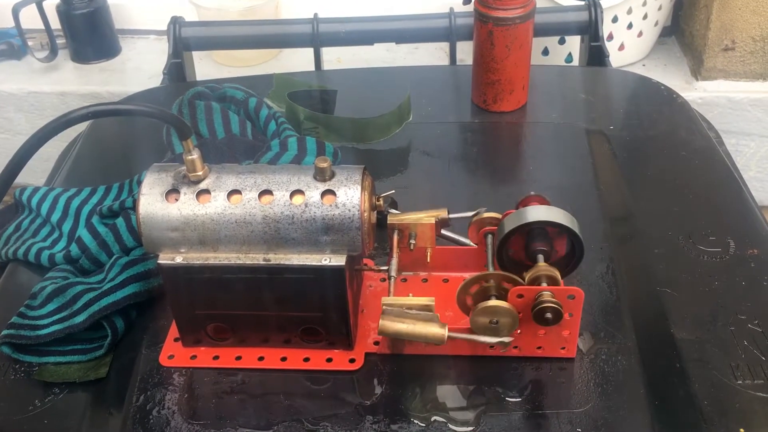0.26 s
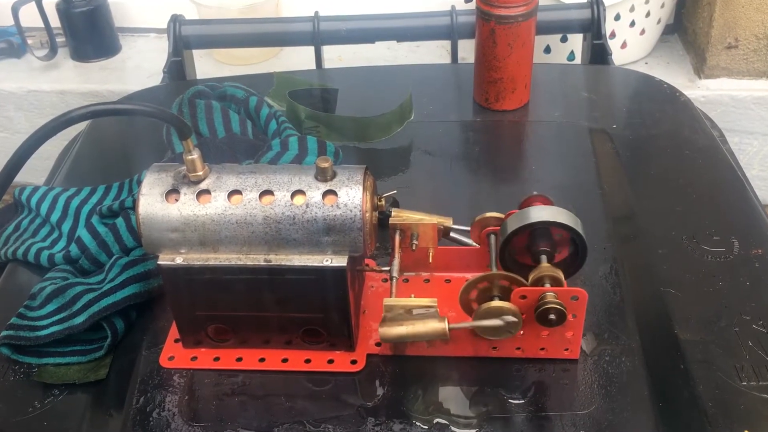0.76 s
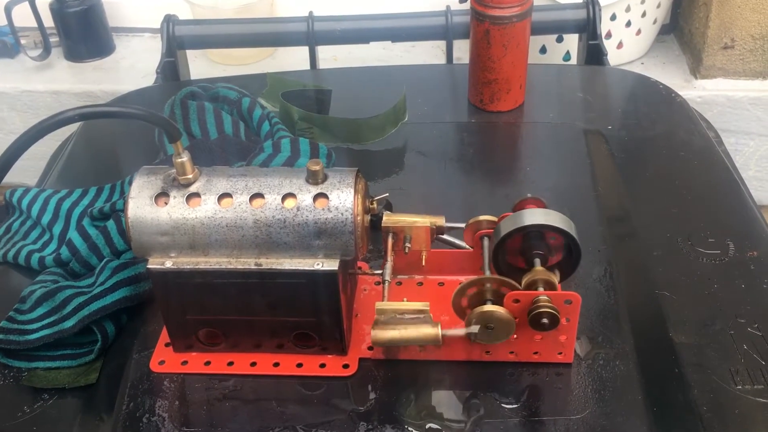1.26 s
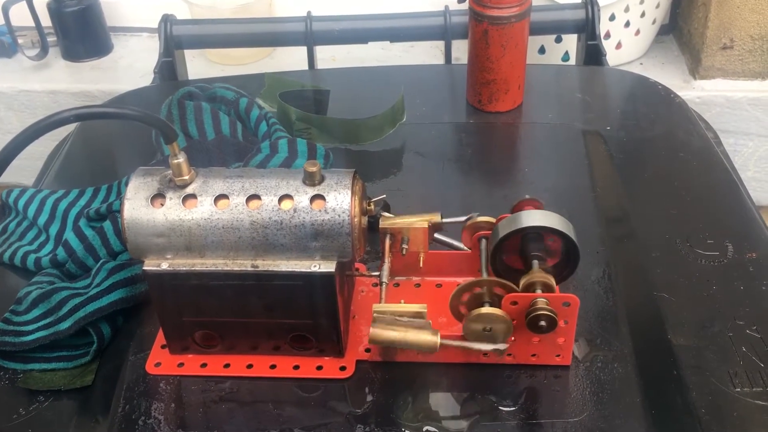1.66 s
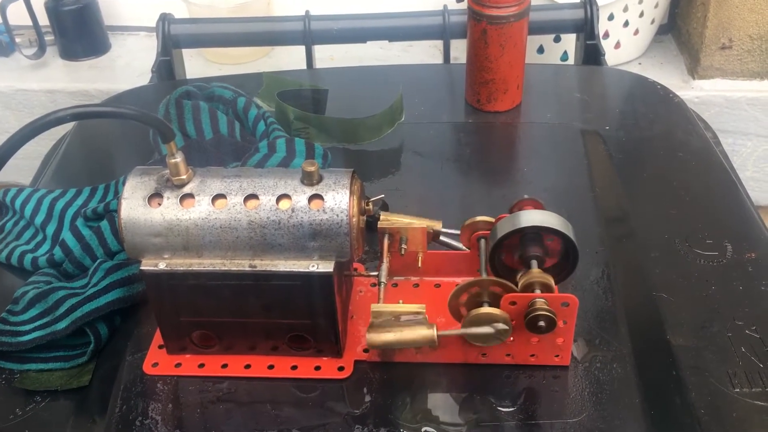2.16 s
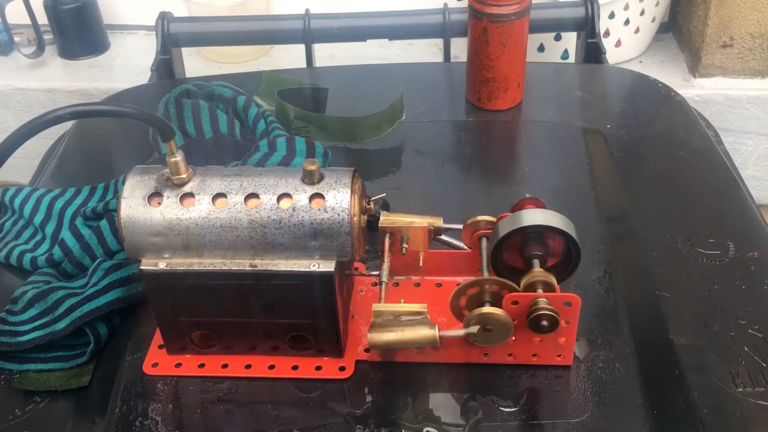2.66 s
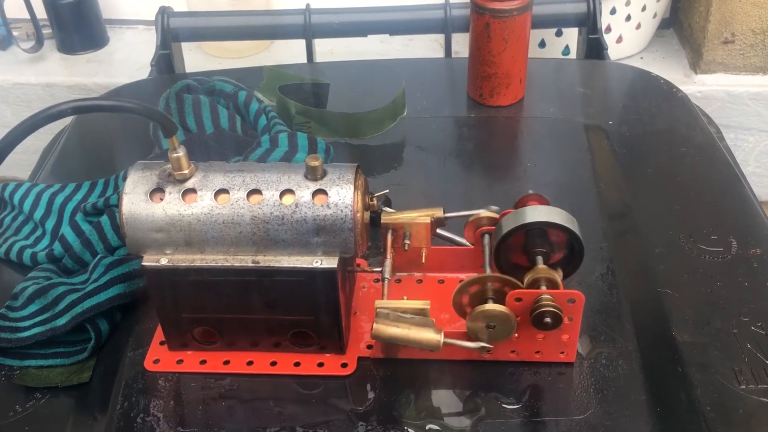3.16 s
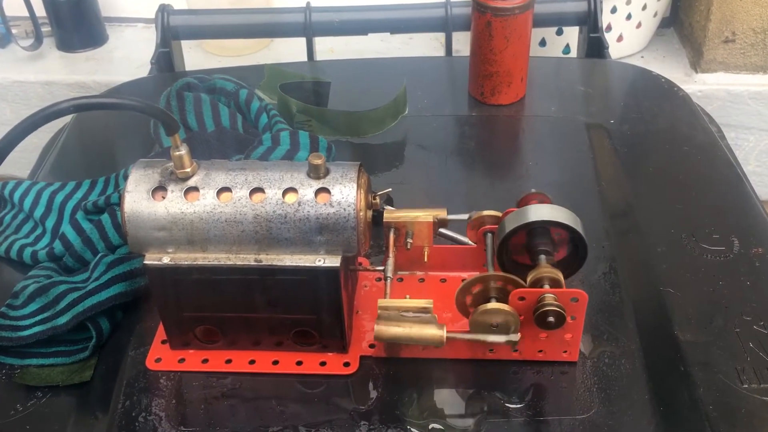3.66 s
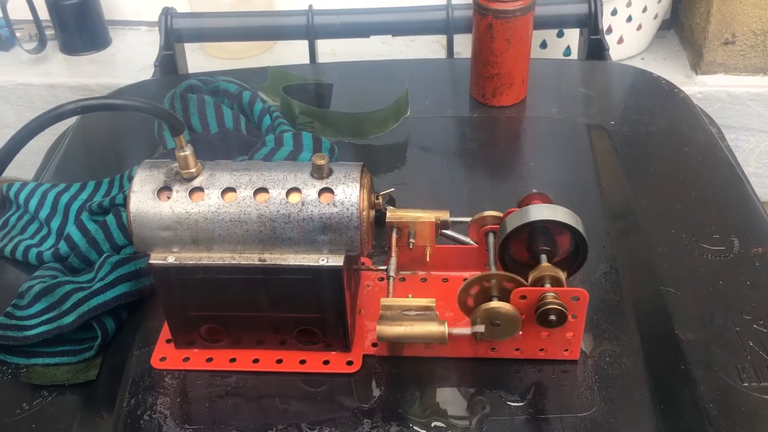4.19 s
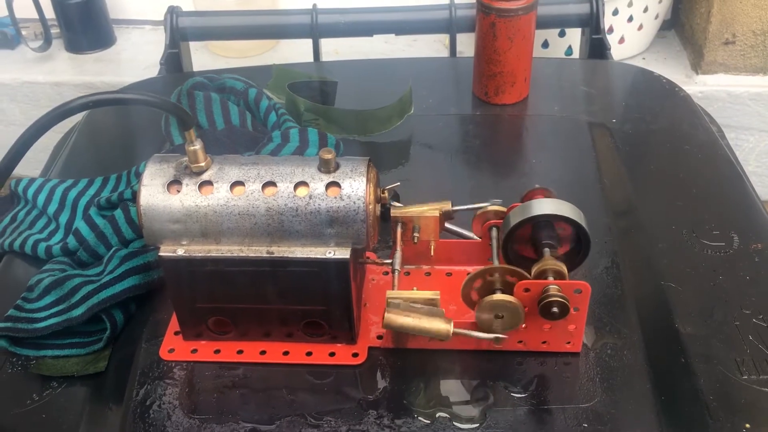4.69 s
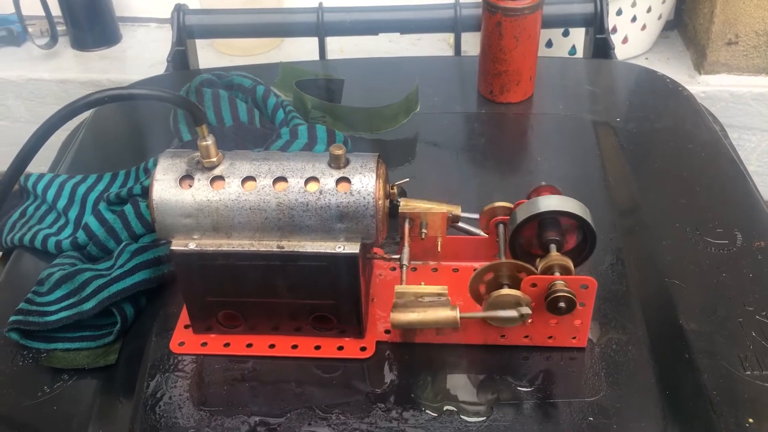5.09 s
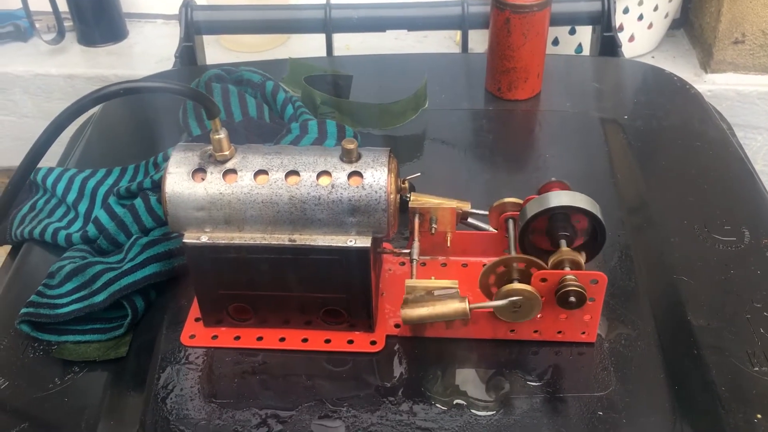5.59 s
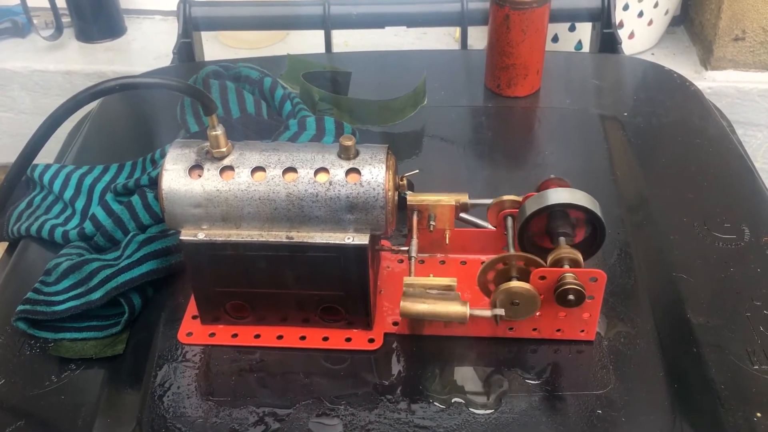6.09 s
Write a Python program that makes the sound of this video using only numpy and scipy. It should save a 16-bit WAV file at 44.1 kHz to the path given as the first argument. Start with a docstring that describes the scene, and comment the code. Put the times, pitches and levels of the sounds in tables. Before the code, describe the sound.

A model steam engine chuffs fast and evenly outdoors, with tinny clattering linkage, a low drumming and a soft breathy hoot.

```python
"""Outdoors, on a plastic bin lid, a model steam engine runs at about eight and a half turns a second.
In every turn the piston rubs, steam chuffs and spits from the port, and the loose linkage knocks on the
tin frame. The exhaust hoots softly, with a clean, sagging note on the return stroke. The lid drums under
the rocking engine, over faint air and boiler simmer; late on the hoot grows louder."""
import sys
import numpy as np
from scipy import signal
from scipy.fft import rfft, irfft
from scipy.io import wavfile
from scipy.ndimage import uniform_filter1d

SR = 44100
rng = np.random.default_rng(int(sys.argv[2]) if len(sys.argv) > 2 else 0)


def file_out(sig):
    """Save sig as 16-bit WAV at sys.argv[1]."""
    # one column per channel
    cols = np.atleast_2d(sig).T
    # limit, then scale
    lim = np.clip(cols, -1, 1)
    pcm = np.round(lim * 32767).astype(np.int16)
    wavfile.write(sys.argv[1], SR, pcm)


N = 279594
TURN_SIZE = 8192  # samples for one turn's sound and its tail
TURN_TIME = np.arange(TURN_SIZE) / SR


def amp(db):
    """Decibels to gain."""
    return 10 ** (np.asarray(db) / 20)


def unit(x):
    """Scales to an energy of one."""
    return x / np.sqrt(np.sum(x ** 2) + 1e-20)


def curve(points, hz):
    """Joins points by straight lines on a log-frequency axis."""
    point_hz, value = np.transpose(points)
    return np.interp(np.log(hz + 1), np.log(point_hz + 1), value)


def colour(x, spectrum):
    """EQs a sound; white noise keeps its power."""
    gain = amp(curve(spectrum, np.fft.rfftfreq(N, 1 / SR)))
    return irfft(rfft(x) * gain / np.sqrt(np.mean(gain ** 2)), N)


def ring(x, modes, opposed=True):
    """Drives decaying modes; heard off the driven spot, neighbours swing in opposite directions."""
    t = np.arange(SR // 4) / SR
    response = np.zeros(len(t))
    for k, (hz, db, t60) in enumerate(modes):
        mode = np.sin(2 * np.pi * hz * t) * amp(-60 * t / t60)
        response += (-1) ** (k * opposed) * amp(db) * unit(mode)
    return signal.oaconvolve(x, unit(response))[:N]


def tinny(x, wet_db, t60=0.055):
    """The boiler shell's countless high modes add a short metallic tail."""
    t = np.arange(SR // 8) / SR
    tail = unit(rng.standard_normal(len(t)) * amp(-60 * t / t60))
    treble = signal.sosfilt(signal.butter(2, 2000, "high", fs=SR, output="sos"), x)
    return x + amp(wet_db) * signal.oaconvolve(treble, tail)[:N]


# tempo of the crank: (time [s], speed [turns/s])
CRANK_SPEED = [(0, 8.5905), (.58, 8.628), (1.44, 8.5312), (2.46, 8.5664), (2.71, 8.5097), (4.23, 8.5144),
               (5.1, 8.3787), (6.3, 8.5061)]
def turn_starts(first_s=-0.0297):
    """The downbeats: times at which the crank begins a turn."""
    t = np.arange(first_s, N / SR, 1 / 1000)
    speed = np.interp(t[:-1], *np.transpose(CRANK_SPEED))
    turns = np.r_[0, np.cumsum(speed * np.diff(t))]
    return np.interp(np.arange(int(turns[-1]) + 1), turns, t)


def scatter(size):
    """One random deviation for each turn."""
    return size * rng.standard_normal(len(turn_starts()))


def each_turn(sounds, delay=0, db=0):
    """Triggers one sound in every turn of the crank, after a delay."""
    starts = turn_starts() + delay
    gains = amp(db + np.zeros(len(starts)))
    track = np.zeros(N + 2 * SR)  # a spare second at each end
    for start, sound in zip(starts, sounds * gains[:, None]):
        track[SR + round(start * SR):][:len(sound)] += sound
    return track[SR:SR + N]


# how alike the turns sound: (frequency [Hz], likeness [0-1])
TURN_LIKENESS = [(100, 1), (400, 0.9), (900, 0.55), (2000, 0.59), (6000, 0), (14000, 0.5)]
def bursts(envelope):
    """One noise burst a turn: the same surfaces meet each time, so part repeats and part is new."""
    envelope = unit(envelope)
    repeating = rng.standard_normal(TURN_SIZE) * envelope
    for _ in range(3):  # flatten the spectrum, then restore the envelope
        repeating = irfft(np.exp(1j * np.angle(rfft(repeating))))
        power = abs(uniform_filter1d(repeating ** 2, size=128))
        repeating *= envelope / np.sqrt(power + 1e-12)
    fresh = rng.standard_normal((len(turn_starts()), TURN_SIZE)) * envelope
    alike = np.clip(curve(TURN_LIKENESS, np.fft.rfftfreq(TURN_SIZE, 1 / SR)), 0, 1)
    return irfft(alike * rfft(unit(repeating)) + np.sqrt(1 - alike ** 2) * rfft(fresh))


def swell(start, attack, hold, release, db=0):
    """Envelope within a turn: a straight rise, a hold, then an exponential fall."""
    t = TURN_TIME - start
    return amp(db) * np.clip(t / attack, 0, 1) * np.exp(-np.maximum(t - attack - hold, 0) / release)


def pulsed_noise(swells, scatter_db):
    """Noise that swells at the same points of every turn, a little stronger or weaker each time."""
    envelope = sum(swell(*row) for row in swells)
    return each_turn(bursts(envelope), db=scatter(scatter_db))


# slow level rides: (time [s], load on the frame [dB], exhaust flow [dB], exhaust note [dB])
RIDES = [(0, -1, -1.5, -1), (1.2, -0.6, -1.5, -8), (3.0, -0.5, -3, -5.5), (4.8, 0.25, -2.5, -4),
         (4.92, 3, -0.5, 2), (4.988, -3.5, 6, 5.5), (5.601, -3, 4, 7.5), (6.34, -3, 4.5, 4.5)]
def ride(lane):
    """Slow gain that follows the engine's load, flow or note."""
    times, load, flow, note = np.transpose(RIDES)
    db = {"load": load, "flow": flow, "note": note}[lane]
    return amp(np.interp(np.arange(N) / SR, times, db))


# EQ of the background bed: (frequency [Hz], level [dB])
AIR_EQ = [(15, -25), (30, -31), (55, -3), (100, -11), (200, -4), (450, -9), (1000, -17), (2500, -24.5),
          (6000, -60), (10000, -46), (16000, -44)]
def air(db=-38.5):
    """Outdoor air and the steady simmer of the boiler."""
    return amp(db) * colour(rng.standard_normal(N), AIR_EQ)


# ring of the tin frame and boiler: (frequency [Hz], level [dB], t60 [s])
FRAME_MODES = [(262.2, -7, 0.079), (380.7, -5.5, 0.1), (435.7, -4.5, 0.087), (493.8, -2.5, 0.088),
               (644, -5.5, 0.042), (721, -2.5, 0.078), (944.4, -9.5, 0.13), (1196, -14.5, 0.058),
               (1235, -4, 0.18), (1330, -16, 0.081), (1537, -13.5, 0.37), (1791, -4, 0.02),
               (2079, -1.5, 0.032), (2346, -7.5, 0.039), (2638, -11.5, 0.031), (3144, -14, 0.15),
               (3530, -18.5, 0.029), (3910, -15, 0.087), (4460, -13.5, 0.078), (5213, -7.5, 0.054),
               (5440, -10.5, 0.0084), (6400, -17, 0.0079), (7540, -48, 0.065), (9360, -15, 0.03)]
def frame(drive):
    """The tin frame rings when scraped or knocked."""
    return ring(drive, FRAME_MODES)


# rubs on the power and return strokes: (time in turn [s], attack [s], hold [s], release [s], level [dB])
RUB_SWELLS = [(.003, 0.0039, 0.031, 0.0049, 0), (.056, 0.0015, 0.042, 0.014, -12.5)]
# EQ of the scrape: (frequency [Hz], level [dB])
RUB_EQ = [(90, -19), (260, -3), (480, 0.5), (600, -5.5), (735, -1.5), (1300, -8.5), (3000, -6), (5300, -4),
          (12000, -5)]
def piston(db=2.5):
    """The piston scrapes through its strokes and shakes the frame."""
    scrape = pulsed_noise(RUB_SWELLS, scatter_db=0.05) * ride("load")
    return amp(db) * frame(colour(scrape, RUB_EQ))


# breaths of escaping steam: (time in turn [s], attack [s], hold [s], release [s], level [dB])
CHUFF_SWELLS = [(.002, 0.027, 0.0054, 0.01, 0.5), (.056, 0.0025, .002, 0.0061, -7.5),
                (.076, 0.0051, 0.0075, 0.026, -12)]
# EQ of the chuff: (frequency [Hz], level [dB])
CHUFF_EQ = [(120, -24), (400, -0.5), (700, 4), (810, 3.5), (1200, 10.5), (1600, -2.5), (2100, 1),
            (2700, -5), (3100, 0.5), (4200, -3.5), (6600, -2), (7800, -7), (9600, -4), (10500, -13.5),
            (12000, -5), (15000, -11)]
def steam_chuff(db=2.5):
    """Steam escapes on each stroke in a broad chuff with a tinny tail."""
    breath = pulsed_noise(CHUFF_SWELLS, scatter_db=0.36)
    return amp(db) * tinny(colour(breath, CHUFF_EQ), wet_db=-5)


# puffs through the exhaust: (time in turn [s], attack [s], hold [s], release [s], level [dB])
PUFF_SWELLS = [(.003, 0.018, 0.0069, 0.011, -5.5), (.06, 0.018, 0.02, 0.013, -5.5)]
# resonances of the exhaust: (frequency [Hz], level [dB], t60 [s])
PIPE_MODES = [(933.7, -1, 0.082), (1062, -2.5, 0.055), (1234, -12, 0.16), (1380, -15.5, 0.014),
              (3150, -26, 0.021)]
def exhaust_hoot(db=1.5):
    """A puff of steam on each stroke makes the exhaust resonate in a breathy hoot."""
    puffs = pulsed_noise(PUFF_SWELLS, scatter_db=0.1) * ride("flow")
    return amp(db) * ring(puffs, PIPE_MODES)


# soft shoves on the lid: (time in turn [s], duration [s], level [dB])
LID_SHOVES = [(.006, 0.0037, -4), (.0135, 0.0046, -2), (.027, 0.0068, 6), (.040, 0.0028, -5.5),
              (.059, 0.0047, 4), (.075, 0.004, -5.5)]
# boom of the plastic lid: (frequency [Hz], level [dB], t60 [s])
LID_MODES = [(53, -8, 0.16), (63.5, -12.5, 0.18), (136.8, -2, 0.38), (159.7, 7, .18), (215, -8.5, 0.096)]
def lid(db=-6, scatter_db=1.75, scatter_s=0.00034, load_share=0.4):
    """The rocking engine shoves the hollow lid, which drums in every turn, harder under load."""
    pushes = np.zeros(N)
    for delay, duration, push_db in LID_SHOVES:
        push = np.sin(np.pi * np.minimum(TURN_TIME / duration, 1)) ** 2
        pushes += each_turn(push / push.sum(), delay + scatter(scatter_s), push_db + scatter(scatter_db))
    return amp(db) * ring(pushes * ride("load") ** load_share, LID_MODES, opposed=False)


# spits as the port opens and shuts: (time in turn [s], attack [s], hold [s], release [s], level [dB])
JET_SWELLS = [(.008, 0.0053, 0.0019, 0.0024, 3), (.046, .006, 0.00071, 0.0016, -17)]
# EQ of the jet: (frequency [Hz], level [dB])
JET_EQ = [(2000, -11.5), (6000, -22), (9700, -8.5), (10600, -13.5), (12500, -8), (13400, -8.5),
          (14300, 1.5), (15200, -7), (16000, -13)]
def port_jet(db=-1.5, load_share=0.15):
    """The port spits a thin, bright jet of steam, stronger under load."""
    spits = pulsed_noise(JET_SWELLS, scatter_db=1.5)
    return amp(db) * colour(spits, JET_EQ) * ride("load") ** load_share


# hits as the slack is taken up, the last a bounce: (time in turn [s], timing scatter [s],
# force scatter [dB], chatter decay [s], clank [dB], tick [dB], ping [dB])
LINKAGE_HITS = [(.0003, 0.00011, 1.6, .0038, -10.5, -7.5, -30),
                (.0191, .00015, 1.05, 0.0027, -7.5, -3, -11), (.0560, .0004, 1.9, 0.0012, -18, -14.5, -9.5),
                (.0758, 0.00047, 1.3, .0034, -12, -13, -11.5), (0.0887, .0008, 0.7, .006, -24, -22, -13)]
# EQ of the tick: (frequency [Hz], level [dB])
TICK_EQ = [(800, -11.5), (2000, -9), (2800, -14), (3500, 2), (4900, -5.5), (5500, -4), (6600, 3),
           (7500, -5), (9500, -4.5), (10600, -15), (13500, -11), (16000, -8)]
# ping of the brass cylinder and crank: (frequency [Hz], level [dB], t60 [s])
BRASS_MODES = [(5740, 3, 0.01), (6415, 2.5, 0.0022), (7100, 0, 0.0084)]
def linkage():
    """Each knock is a short chatter of brass on steel: it ticks, pings the brass and rings the frame."""
    clanks, ticks, pings = np.zeros((3, N))
    for delay, scatter_s, scatter_db, decay, clank_db, tick_db, ping_db in LINKAGE_HITS:
        chatter = bursts(np.exp(-TURN_TIME / decay))
        blows = each_turn(chatter, delay + scatter(scatter_s), scatter(scatter_db))
        clanks += amp(clank_db) * blows
        ticks += amp(tick_db) * blows
        pings += amp(ping_db) * blows
    body = amp(5) * frame(clanks * ride("load"))
    bright = amp(-0.5) * colour(ticks, TICK_EQ) + amp(-3.5) * ring(pings, BRASS_MODES)
    return body + tinny(bright, wet_db=-7.5)


# envelope of the exhaust's note: (time in turn [s], attack [s], hold [s], release [s])
NOTE_SWELL = (0.0733, 0.011, 0.0072, 0.0082)
def exhaust_note(db=-33.5, onset_hz=966, sag_hz_per_s=697,
                 scatter_hz=7.9, scatter_db=2, scatter_s=0.00201):
    """On the return stroke the exhaust sounds a clean note that sags as the pressure falls."""
    since_onset = TURN_TIME - NOTE_SWELL[0]
    hz = onset_hz + scatter(scatter_hz)[:, None] - sag_hz_per_s * since_onset
    notes = swell(*NOTE_SWELL) * np.sin(2 * np.pi * np.cumsum(hz, axis=1) / SR)
    return amp(db) * each_turn(notes, scatter(scatter_s), scatter(scatter_db)) * ride("note")


def scene():
    """The engine and lid over the air bed, in mono."""
    mix = air() + piston() + steam_chuff() + exhaust_hoot() + lid()
    mix += port_jet() + linkage() + exhaust_note()
    return mix[None]


def record(dry, low_cut_hz=45, high_cut_hz=15820):
    """The microphone sheds deep bass, and a steep filter trims the very top."""
    thin = signal.sosfilt(signal.butter(4, low_cut_hz, "high", fs=SR, output="sos"), dry)
    high_cut = signal.firwin(401, high_cut_hz, window=("kaiser", 9), fs=SR)
    return signal.oaconvolve(thin, high_cut[None], "same")


dry = scene()
out = record(dry)
file_out(out)
```